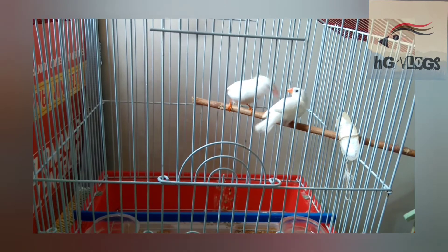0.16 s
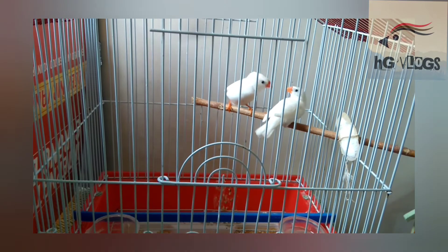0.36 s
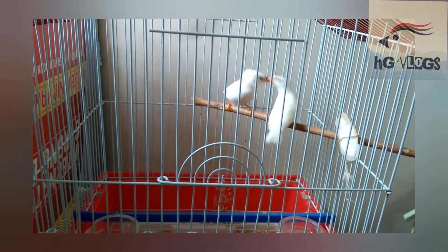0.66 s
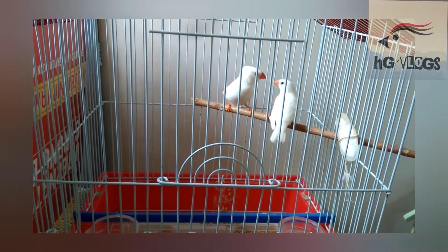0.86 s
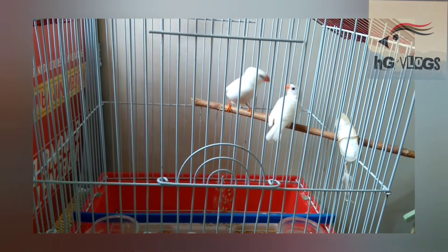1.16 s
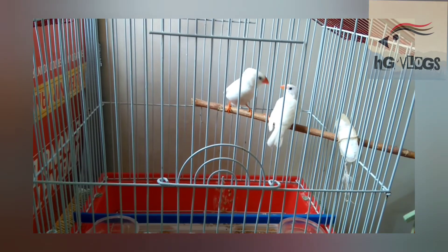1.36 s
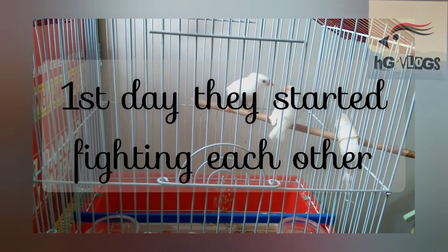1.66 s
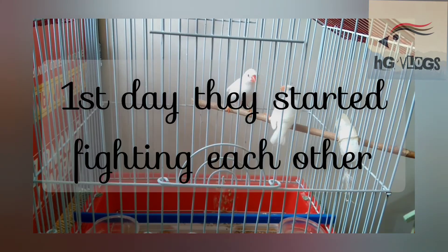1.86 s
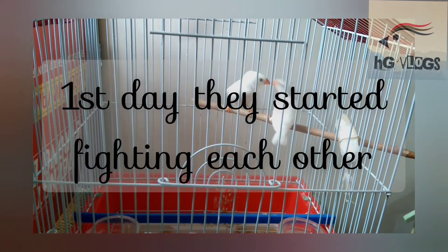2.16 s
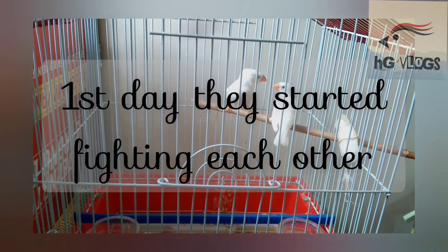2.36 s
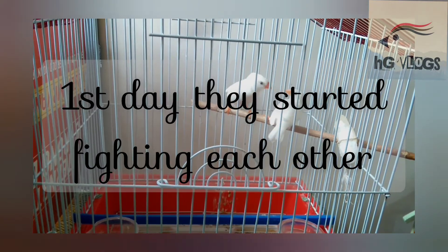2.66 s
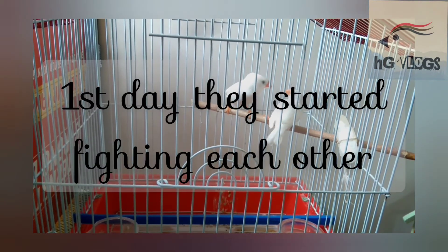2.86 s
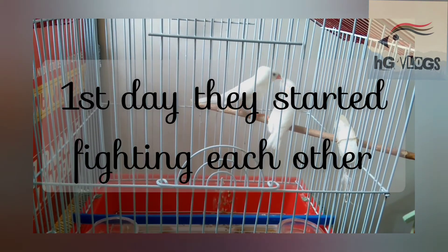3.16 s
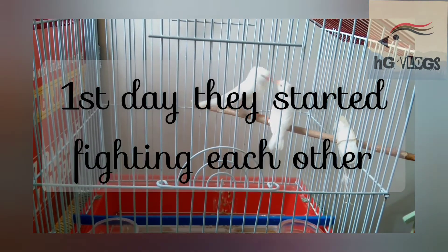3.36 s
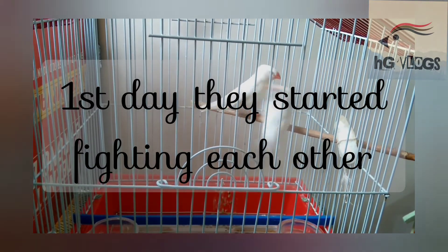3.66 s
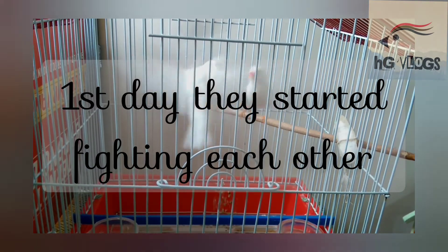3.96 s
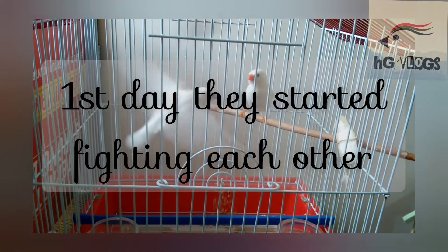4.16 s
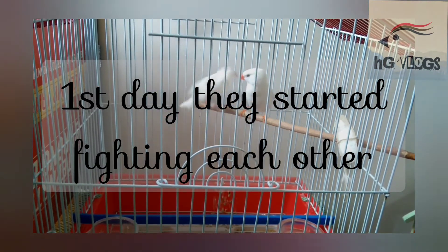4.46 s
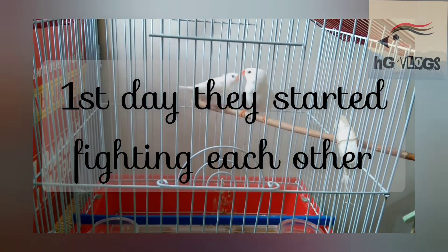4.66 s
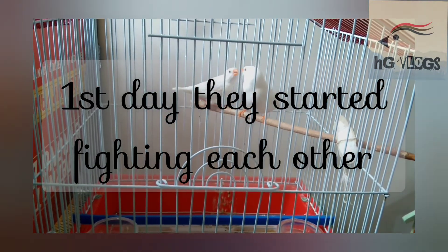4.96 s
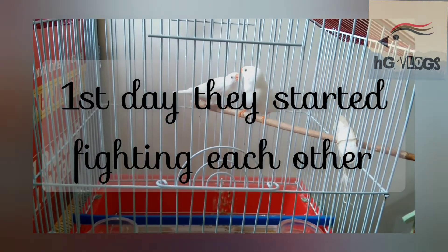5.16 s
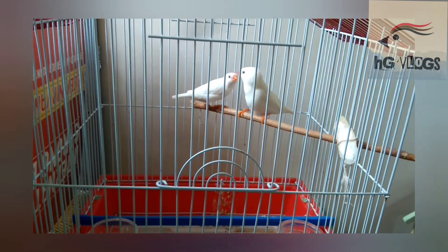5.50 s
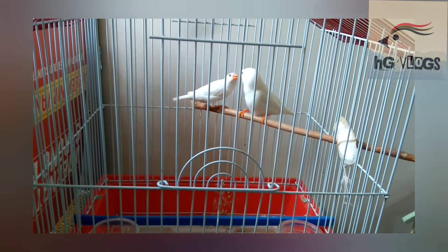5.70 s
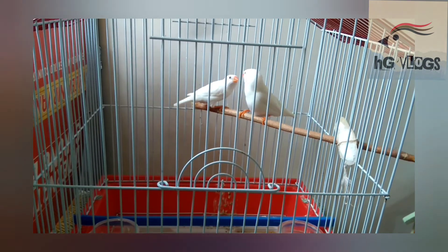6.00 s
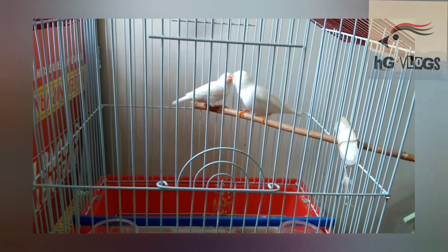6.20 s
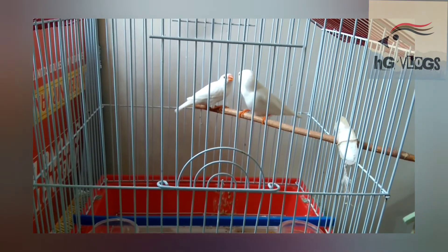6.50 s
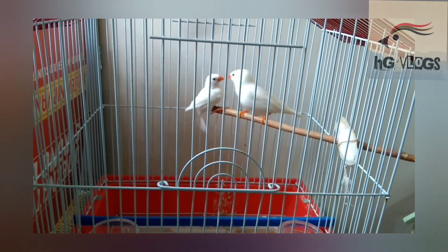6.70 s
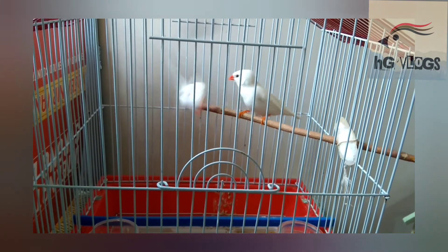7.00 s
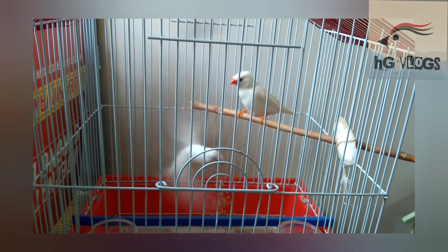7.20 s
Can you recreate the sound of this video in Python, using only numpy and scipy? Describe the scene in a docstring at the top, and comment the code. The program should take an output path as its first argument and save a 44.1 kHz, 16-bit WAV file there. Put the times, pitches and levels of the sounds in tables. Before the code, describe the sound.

Small caged birds give sharp nasal chirps and quick whistle-to-rasp phrases, wings whirring in short bursts, feet ticking on perch and wire.

```python
"""Finches squabbling in a cage

Zebra finches squabble in a wire cage in a small, hard-walled room. Between calls a male repeats one motif:
nasal stack, rasp, whistle breaking into a harsh slide, then a snarl or a soft ending. Voices are stacked
harmonics, near-pure whistles and noise bands. Wings whirr as pulsing noise, and feet knock on perch and wires
as ringing tones. The recorder's expander pulls the room noise down in the pauses."""
import sys
import numpy as np
from scipy import signal
from scipy.fft import rfft, irfft, next_fast_len
from scipy.io import wavfile
from scipy.ndimage import uniform_filter1d

SR = 44100
rng = np.random.default_rng(int(sys.argv[2]) if len(sys.argv) > 2 else 0)


def unload_audio(sound):
    """Save the sound as a 16-bit wav file, at the path given as the first command line argument."""
    columns = np.transpose(np.atleast_2d(sound))
    # keep every value between -1 and 1, then stretch to whole-number steps
    steps = np.round(np.clip(columns, -1, 1) * 32767)
    wavfile.write(sys.argv[1], SR, steps.astype(np.int16))


N = 323694
TIME = np.arange(N) / SR


def from_db(db):
    """Turn decibels into gain."""
    return 10 ** (np.asarray(db) / 20)


def rms_one(x):
    """Scale to unit power."""
    return x / np.sqrt(np.mean(x ** 2) + 1e-20)


def along(rows, t):
    """Read each column of a curve at the times t."""
    s, *columns = np.transpose(rows)
    return [np.interp(t, s, c) for c in columns]


def at_hz(points, hz):
    """Read a curve over frequency, with frequency on a log scale."""
    f, value = np.transpose(points)
    return np.interp(np.log(hz + 1), np.log(f), value)


def coloured(x, spectrum, tilt_db=0):
    """Filter by a spectrum, tilted in dB per octave about 4 kHz and falling away below its first point."""
    size = next_fast_len(x.shape[-1])
    hz = np.fft.rfftfreq(size, 1 / SR) + 1
    octaves = np.log2(hz / 4000)
    gain = from_db(at_hz(spectrum, hz) + tilt_db * octaves)
    gain = gain * np.minimum(hz / spectrum[0][0], 1) ** 2
    return irfft(rfft(x, size) * gain, size)[..., :x.shape[-1]]


def wobble(size, hz):
    """Random motion up to about a given rate, with spread 1."""
    low_pass = signal.butter(2, hz, fs=SR, output="sos")
    noise = rng.standard_normal(2 * size)
    return rms_one(signal.sosfilt(low_pass, noise)[size:])  # skip the filter's start


# How alike diffuse sound is at the two ports. Each row: frequency in Hz, likeness (1 is identical).
PORT_LIKENESS = [(30, 0.62), (150, 0.94), (350, 0.9), (700, 0.29), (2000, 0.13), (10000, 0.11)]


def stereo_noise(spectrum):
    """Diffuse noise reaches both ports much alike in the bass and mostly unalike in the treble."""
    mid, side = rfft(rng.standard_normal((2, next_fast_len(N, True))))
    alike = np.clip(at_hz(PORT_LIKENESS, np.linspace(0, SR / 2, len(mid))), -1, 1)
    pair = irfft(np.sqrt(1 + alike) * mid + np.sqrt(1 - alike) * side * [[1], [-1]])
    return rms_one(coloured(pair[:, :N], spectrum))


# Colour of the room's own noise. Each row: frequency in Hz, relative level in dB per Hz.
ROOM_NOISE_COLOUR = [(20, -28.5), (60, -5), (110, -7.5), (200, -5.5), (380, 2.5), (600, -2), (1000, -6),
                     (2000, -12), (4000, -20), (8000, -22.5), (14000, -28.5)]


def room_noise(level_db=-53):
    """The room's own noise is steady, diffuse and strongest in the lower range."""
    return from_db(level_db) * stereo_noise(ROOM_NOISE_COLOUR)


def add(out, sound, s, pan_db):
    """Mix a sound in at a time in seconds; a positive balance leans left."""
    start = round(s * SR)
    part = sound[max(-start, 0):max(N - start, 0)]
    start = max(start, 0)
    out[:, start:start + len(part)] += part * from_db([[pan_db / 2], [-pan_db / 2]])


def sing(events, gesture, source, timbre, gain_db, tilt_db=0, pitch_spread=.005):
    """Play one syllable's gesture at each of its times, never quite at the same pitch."""
    out = np.zeros((2, N))
    for s, level_db, length, transpose, pan_db in events:
        # Finer steps through the gesture make it last longer.
        t = np.arange(gesture[0][0], gesture[-1][0], 1 / (SR * length))
        pitch, effort_db, rough = along(gesture, t)
        pitch = pitch * transpose * (1 + pitch_spread * rng.standard_normal())
        voice = source(pitch, effort_db, np.clip(rough, 0, 1), tilt_db, timbre)
        add(out, voice * from_db(level_db + effort_db + gain_db), s + t[0] * length, pan_db)
    return out


def reedy(pitch, effort_db, rough, tilt_db, throat,
          jitter=.06, jitter_hz=330, shimmer=0.38, mellowing=0.55, blur_hz=8000):
    """The syrinx gives 20 harmonics, duller at low effort; when rough, its cycles jitter and air hisses."""
    size = len(pitch)
    shaky_pitch = pitch * (1 + jitter * rough * wobble(size, jitter_hz))
    phase = 2 * np.pi * np.cumsum(shaky_pitch) / SR
    k = np.arange(1, 21)[:, None]  # harmonic numbers
    strength = from_db(mellowing * effort_db * np.log2(k)) / (1 + (k * pitch / blur_hz) ** 6)
    strength /= np.sqrt(np.sum(strength ** 2, axis=0) / 2)
    start_phases = rng.uniform(0, 2 * np.pi, k.shape)
    partials = np.sum(strength * np.cos(k * phase + start_phases), axis=0)
    hiss = rms_one(rng.standard_normal(size) * (1 + 1.4 * np.cos(phase)))  # pulses with each cycle
    voice = coloured((1 - rough) * partials + from_db(4) * rough * hiss, throat, tilt_db)
    # Even out the loudness, so that the gesture alone sets the level.
    voice = voice / np.sqrt(uniform_filter1d(voice ** 2, size=400) + 1e-12)
    return voice * (1 + shimmer * rough * wobble(size, jitter_hz))


# In all the tables below, levels are in dB before the gain that each sound gets when played.
# A loud call, rising then falling. Each row: seconds after onset, pitch in Hz, level in dB, roughness 0-1.
LOUD_CALL = [(-.006, 1110, -27.5, 0.4), (0, 1270, -8.5, 0.53), (.011, 1447, -4, 0.2), (.032, 1523, 0, .12),
             (.044, 1490, -4.5, .22), (.056, 1309, -3, 0), (.067, 1060, -12, .45), (.080, 905, -8.5, 0.5),
             (0.09, 881, -29, 0.4)]
# A short, gently falling call. Each row: seconds after onset, pitch in Hz, level in dB, roughness 0-1.
TET_CALL = [(-.004, 892, -18, .15), (.010, 878.4, -4, .12), (.028, 871, -4, .12), (0.049, 836, -2, 0.1),
            (.070, 795, -4, .3), (0.082, 773, -42, .4)]
# A call sliding down. Each row: seconds after onset, pitch in Hz, level in dB, roughness 0-1.
SLURRED_CALL = [(-.006, 1196, -21, 0.14), (0.017, 1140, -10.5, 0.24), (0.037, 1026, -9.5, .3),
                (.053, 889, -6.5, .36), (0.078, 746, -9.5, 0.87)]
# A short note turning rough. Each row: seconds after onset, pitch in Hz, level in dB, roughness 0-1.
SHORT_NOTE = [(-.014, 1020, -14, .08), (-.003, 986.5, -7.5, 0.092), (.008, 992, -3.5, .1),
              (.019, 920, -7, 0.27), (0.031, 809, -4, 0.98)]
# A short hoarse note. Each row: seconds after onset, pitch in Hz, level in dB, roughness 0-1.
HOARSE_NOTE = [(-.016, 1104, -6, 0.67), (.002, 1031, 0.5, 0.57), (0.019, 953, -0.5, 0.53),
               (0.033, 796, -4.5, 0.4), (0.043, 700, -29.5, .8)]
# A low note, up then down. Each row: seconds after onset, pitch in Hz, level in dB, roughness 0-1.
MEWING_NOTE = [(-.008, 601, -15.5, 0.62), (.004, 631, -4.5, .3), (.018, 674, -0.5, 0.18),
               (0.033, 620, -9.5, .3), (.044, 571, -20, 0.78)]
# A soft arc that leaps up and falls. Each row: seconds after onset, pitch in Hz, level in dB, roughness 0-1.
SOFT_ARC = [(-.002, 897, -12, .15), (.005, 1726, -10, .09), (.012, 1638, -10.5, .08),
            (.021, 1330, -12, .08), (.029, 952, -13.5, .12), (0.036, 751, -24.5, .4)]
# Throat and beak colour of the loud call and mew. Each row: frequency in Hz, level in dB.
LOUD_CALL_THROAT = [(700, -12.5), (1500, -17.5), (2200, -16.5), (3000, -11.5), (4500, -2), (6000, -8),
                    (7000, -8.5), (8500, -16), (11000, -20), (14000, -49.5)]
# Throat and beak colour of the tet call. Each row: frequency in Hz, level in dB.
TET_CALL_THROAT = [(850, -19), (1750, -15.5), (2600, -1.5), (3500, 0), (4400, 0), (5300, -12.5),
                   (7000, -13), (9000, -12.5), (14000, -40.5)]
# Throat and beak colour of slurred, short and hoarse notes. Each row: frequency in Hz, level in dB.
SOFT_NOTE_THROAT = [(600, -20), (1100, -7), (1900, -9.5), (3000, 3.5), (4300, -1), (5600, -2.5), (6600, -5),
                    (9000, -13), (14000, -41)]
# Throat and beak colour of the arc. Each row: frequency in Hz, level in dB.
SOFT_ARC_THROAT = [(700, -5), (1100, -5), (1650, -11.5), (2400, -6), (3300, -14.5), (5000, -14), (7000, -8),
                   (14000, -35)]
# Loud calls. Each row: start in seconds, level in dB, length factor, pitch factor, left-right in dB.
LOUD_CALL_TIMES = [(.2024, -15, .88, 0.99, 7.5), (.9509, -15.5, 0.96, 0.98, 0)]
# Tet calls. Each row: start in seconds, level in dB, length factor, pitch factor, left-right in dB.
TET_TIMES = [(.8744, -30.5, 0.97, 0.99, .5), (3.6552, -38, 1.0, 0.87, 5.9)]
# Slurred calls. Each row: start in seconds, level in dB, length factor, pitch factor, left-right in dB.
SLUR_TIMES = [(.1243, -32, 0.96, 1.08, 2), (2.103, -39.5, 0.79, 1.05, 2), (3.6067, -39, 0.74, 1.0, 4.5),
              (5.0958, -41, 0.72, 1.03, 5.7)]
# Short notes. Each row: start in seconds, level in dB, length factor, pitch factor, left-right in dB.
SHORT_NOTE_TIMES = [(1.934, -35, 0.91, .98, 0.5), (4.92, -35.5, 0.86, 1.03, 5.5)]
# Hoarse notes. Each row: start in seconds, level in dB, length factor, pitch factor, left-right in dB.
HOARSE_NOTE_TIMES = [(.0034, -32, 1.0, 1.0, -2.5), (6.7402, -31.5, 1, 0.95, 6.5)]
# Mews. Each row: start in seconds, level in dB, length factor, pitch factor, left-right in dB.
MEW_TIMES = [(.7676, -28, 0.94, 0.95, 0)]
# Soft arcs between the motifs. Each row: start in seconds, level in dB.
ARC_TIMES = [(0.359, -36.5), (1.106, -34), (2.2068, -35.5), (2.6901, -34), (3.709, -35), (5.2147, -36.5),
             (5.6801, -38), (6.1935, -36), (6.7133, -35.5)]
ARC_PAN_DB = 5


def calls(trail_after_s=.034, trail_db=-16.5):
    """The syrinx gives single calls, loud and soft; each soft arc trails off into a faint hoarse note."""
    arcs = [(s, level_db, 1, 1, ARC_PAN_DB) for s, level_db in ARC_TIMES]
    trails = [(s + trail_after_s, level_db, 1, 1, ARC_PAN_DB) for s, level_db in ARC_TIMES]
    return (sing(LOUD_CALL_TIMES, LOUD_CALL, reedy, LOUD_CALL_THROAT, gain_db=-6.5, tilt_db=2.0)
            + sing(TET_TIMES, TET_CALL, reedy, TET_CALL_THROAT, gain_db=-1.0)
            + sing(SLUR_TIMES, SLURRED_CALL, reedy, SOFT_NOTE_THROAT, gain_db=0, tilt_db=0.7)
            + sing(SHORT_NOTE_TIMES, SHORT_NOTE, reedy, SOFT_NOTE_THROAT, gain_db=-6.0)
            + sing(HOARSE_NOTE_TIMES, HOARSE_NOTE, reedy, SOFT_NOTE_THROAT, gain_db=-9, tilt_db=3.0)
            + sing(MEW_TIMES, MEWING_NOTE, reedy, LOUD_CALL_THROAT, gain_db=-6, tilt_db=3.0)
            + sing(arcs, SOFT_ARC, reedy, SOFT_ARC_THROAT, gain_db=-1.0)
            + sing(trails, HOARSE_NOTE, reedy, SOFT_NOTE_THROAT, gain_db=trail_db, tilt_db=-0.5))


def whistled(pitch, effort_db, rough, tilt_db, spread_hz):
    """A near-pure tone breaks up, when rough, into a chaotic band round its pitch."""
    size = len(pitch)
    phase = 2 * np.pi * np.cumsum(pitch) / SR
    tone = np.sqrt(2) * np.sin(phase)
    chaos = wobble(size, spread_hz) * np.cos(phase) + wobble(size, spread_hz) * np.sin(phase)
    voice = ((1 - rough) * tone + rough * chaos) / np.hypot(1 - rough, rough)
    return voice * from_db(tilt_db * np.log2(pitch / pitch.mean()))


def harsh(pitch, effort_db, rough, tilt_db, band, flutter=.35, flutter_hz=300):
    """Chaotic vibration gives a fluttering band of noise with a sharp lower edge at the pitch."""
    size = len(pitch)
    chaos = signal.hilbert(coloured(rng.standard_normal(size), band, tilt_db))
    shift = np.exp(2j * np.pi * np.cumsum(pitch) / SR)  # moves the whole band up by the pitch
    voice = rms_one(np.real(chaos * shift))
    return voice * (1 + flutter * rough * wobble(size, flutter_hz))


def buzzing(pitch, effort_db, rough, tilt_db, spread_hz, beat_hz=1730, depth=0.27):
    """The other side of the syrinx shakes a whistle, adding a sideband above and below it."""
    beat = np.cos(2 * np.pi * beat_hz * np.arange(len(pitch)) / SR)
    return whistled(pitch, effort_db, rough, tilt_db, spread_hz) * (1 + depth * beat)


# A faint lead-in to the stack. Each row: seconds after onset, pitch in Hz, level in dB, roughness 0-1.
STACK_LEAD_IN = [(-.032, 1064, -31.5, .05), (-.020, 1054, -17.5, .05), (-.007, 1032, -22, .04),
                 (.004, 1042, -26, .15), (.014, 930, -15.5, .2), (.026, 835, -15, 0.19)]
# The nasal stack, sinking in pitch. Each row: seconds after onset, pitch in Hz, level in dB, roughness 0-1.
NASAL_STACK = [(-.006, 658.5, -24.5, 0.24), (.003, 643.2, -7.5, 0.16), (.016, 631, -5, 0.24),
               (.029, 490.8, -4, .17), (.042, 440, -9.5, 0.39), (.053, 426.4, -23.5, .6)]
# The rasp. Each row: seconds from the whistle's onset, pitch in Hz, level in dB, roughness 0-1.
SHORT_RASP = [(-.041, 879, -17, 0.61), (-.037, 1057, -3, 0.39), (-.029, 1080, 1.5, .6),
              (-.021, 845, 0, 0.66)]
# A tiny high pip. Each row: seconds from the whistle's onset, pitch in Hz, level in dB, roughness 0-1.
HIGH_PIP = [(-.016, 5550, -33, .15), (-.012, 5230, -6, .2), (-.007, 5150, -25.5, .3)]
# The whistle, breaking up. Each row: seconds after onset, pitch in Hz, level in dB, roughness 0-1.
BREAKING_WHISTLE = [(-.001, 5800, -30, .2), (.004, 5530, -4.5, .055), (.013, 5340, 1.5, .04),
                    (.017, 6450, -4, .2), (0.025, 6150, -8, .55), (.036, 5418, -10, 1),
                    (.054, 4900, -11, .8)]
# A second tone under the whistle. Each row: seconds after onset, pitch in Hz, level in dB, roughness 0-1.
WHISTLE_UNDERTONE = [(0, 4250, -36, 0), (.007, 4270, -23, .1), (.018, 4280, -23, .2), (.027, 4070, -26, .4)]
# The harsh slide down. Each row: seconds after onset, lower edge in Hz, level in dB, roughness 0-1.
HARSH_SLIDE = [(-.022, 5203, -20, .92), (-.013, 4692, -10, 0.93), (-.006, 3519, -15, 0.99),
               (.004, 3250, -5.5, 1), (.026, 3085, -0.5, 1), (.042, 2850, -5, 1), (.055, 2373, -5, 0.97),
               (.066, 2362, -18, .89)]
# The snarl. Each row: seconds after onset, pitch in Hz, level in dB, roughness 0-1.
LONG_SNARL = [(-.004, 1600, -13.5, 0.4), (.006, 1749, -5, 0.5), (.036, 1713, -0.5, 0.45),
              (.050, 1604, -6.5, 0.56), (.068, 1252, -2.5, 0.41), (.094, 1050, -3, 0.49),
              (.124, 929.5, -4.5, .48), (.142, 820, -11.5, 1)]
# The far side of the syrinx buzzing through the snarl.
# Each row: seconds after the snarl's onset, pitch in Hz, level in dB, roughness 0-1.
SNARL_BUZZ = [(-.048, 5100, -14, 0.4), (-.024, 5020, 5.5, 1), (0, 4986, -10, 0), (.030, 4810, 2.5, 0),
              (0.056, 4800, 1.5, .8), (.115, 4960, -14, 0), (.138, 4960, -35, .9)]
# Throat and beak colour of the stack. Each row: frequency in Hz, level in dB.
NASAL_STACK_THROAT = [(500, -39), (1150, -4.5), (1700, -12), (2500, -2.5), (3300, 5.5), (4200, 4.5),
                      (5200, 3), (6000, -4.5), (9000, -12), (14000, -40.5)]
# Throat and beak colour of the rasp. Each row: frequency in Hz, level in dB.
SHORT_RASP_THROAT = [(500, -11), (1000, -10), (2500, -1), (3500, 3), (5500, 2.5), (6800, 0.5), (9000, -8),
                     (14000, -49)]
# Throat and beak colour of the snarl. Each row: frequency in Hz, level in dB.
LONG_SNARL_THROAT = [(600, -12), (1100, -7), (1700, -6), (2300, -6.5), (3300, 0), (4100, 2), (5000, 2.5),
                     (6300, -4), (8500, -10.5), (14000, -31.5)]
# The harsh slide's noise band. Each row: Hz above its lower edge, level in dB.
HARSH_SLIDE_BAND = [(250, 8.5), (550, 6.5), (1150, 3.5), (1900, -13.5), (3000, -9.5), (4500, -20.5),
                    (7000, -42.5), (11000, -64.5)]
# The motifs. Each row: whistle's time in seconds, seconds by which the stack comes before it, level in dB,
# whistle's extra level in dB, whistle's pitch factor, left-right in dB, ends in a snarl (0 or 1).
MOTIF_TIMES = [(0.6111, 0.13, -24.5, 2.5, 1.015, 7, 0), (1.356, 0.13, -25, 2, 1.05, 7, 0),
               (2.4562, 0.12, -24.5, 2.5, 0.98, 3, 0), (2.9452, 0.13, -24, 3.5, 1.018, 4.5, 1),
               (3.9597, 0.13, -23.5, 2.5, 0.99, 5.5, 0), (5.464, 0.12, -23.5, -1.5, 0.96, 4, 0),
               (5.8911, 0.13, -23.5, -3, .975, 6.5, 1), (6.4419, 0.12, -25, 1, 0.95, 6, 0),
               (6.963, 0.13, -23, 0, 0.98, 7.5, 0)]
# The motif's rhythm, in seconds after the whistle.
SLIDE_AFTER_S, SNARL_AFTER_S, ARC_AFTER_S, HOARSE_AFTER_S = .041, .096, 0.13, .132
CLOSING_ARC_LENGTH = .78  # length factor: the arc that closes a motif is hurried


def song():
    """Motifs keep nearly one rhythm; the syrinx's two sides overlap in stack, whistle and snarl."""
    stacks, rasps, whistles, slides, snarls, arcs, hoarse_notes = [], [], [], [], [], [], []
    for s, lead_s, level_db, whistle_db, pitch, pan_db, snarled in MOTIF_TIMES:
        stacks.append((s - lead_s, level_db, 1, 1, pan_db))
        rasps.append((s, level_db, 1, 1, pan_db))
        whistles.append((s, level_db + whistle_db, 1, pitch, pan_db))
        slides.append((s + SLIDE_AFTER_S, level_db, 1, 1, pan_db))
        if round(snarled):
            snarls.append((s + SNARL_AFTER_S, level_db, 1, 1, pan_db))
        else:
            arcs.append((s + ARC_AFTER_S, level_db, CLOSING_ARC_LENGTH, 1, ARC_PAN_DB))
            hoarse_notes.append((s + HOARSE_AFTER_S, level_db, 1, 1, pan_db))
    # A whistled sound's plain number is the spread of its chaos in Hz.
    return (sing(stacks, STACK_LEAD_IN, reedy, NASAL_STACK_THROAT, gain_db=-7.0)
            + sing(stacks, NASAL_STACK, reedy, NASAL_STACK_THROAT, gain_db=-8.5)
            + sing(rasps, SHORT_RASP, reedy, SHORT_RASP_THROAT, gain_db=-16.0, tilt_db=-1)
            + sing(rasps, HIGH_PIP, whistled, 400, gain_db=-4.5)
            + sing(whistles, BREAKING_WHISTLE, whistled, 340, gain_db=-7)
            + sing(whistles, WHISTLE_UNDERTONE, whistled, 150, gain_db=-2)
            + sing(slides, HARSH_SLIDE, harsh, HARSH_SLIDE_BAND, gain_db=-8, tilt_db=0.9)
            + sing(snarls, LONG_SNARL, reedy, LONG_SNARL_THROAT, gain_db=-8.5)
            + sing(snarls, SNARL_BUZZ, buzzing, 210, gain_db=-14.5)
            + sing(arcs, SOFT_ARC, reedy, SOFT_ARC_THROAT, gain_db=-16.5)
            + sing(hoarse_notes, HOARSE_NOTE, reedy, SOFT_NOTE_THROAT, gain_db=-23.5, tilt_db=-1.0))


# Flurries of wing beats.
# Each row: start in seconds, length in seconds, air puff level in dB, feather rustle level in dB.
WING_FLURRIES = [(0.761, 0.03, -64, -55), (3.625, 0.088, -69, -63), (3.866, .23, -49.5, -55),
                 (4.136, .36, -51.5, -58), (4.558, 0.038, -55, -51.5), (4.66, 0.098, -59, -57.5),
                 (6.046, 0.37, -58, -65), (6.431, 0.21, -52.5, -64), (6.717, 0.086, -57, -48.5),
                 (6.837, 0.46, -53, -55)]
# Colour of the air puffs. Each row: frequency in Hz, relative level in dB per Hz.
PUFF_COLOUR = [(25, -24), (65, -8.5), (170, -1), (290, -2), (520, -5), (1000, -11), (2500, -36.5)]
# Colour of the feather rustle. Each row: frequency in Hz, relative level in dB per Hz.
FEATHER_COLOUR = [(500, -2.5), (1200, -0.5), (3500, -2), (6000, -5), (10000, -5), (14000, -20.5)]
WINGBEATS_PER_S = 29  # on average
FLURRY_ATTACK_S, FLURRY_RELEASE_S = 0.03, .07


def wings(puff_depth=0.41, rustle_depth=0.088, uneven_db=1.0):
    """Flurries swell, hold and fade; each uneven stroke pushes a puff of air and brushes the feathers."""
    air, brush = 0, 0
    for s, length_s, puff_db, rustle_db in WING_FLURRIES:
        before = (s - TIME) / FLURRY_ATTACK_S
        after = (TIME - s - length_s) / FLURRY_RELEASE_S
        effort = np.exp(-np.clip(np.maximum(before, after), 0, 20))
        air = np.maximum(air, from_db(puff_db) * effort)
        brush = np.maximum(brush, from_db(rustle_db) * effort)
    beat_hz = WINGBEATS_PER_S * (1 + 0.1204 * wobble(N, 7.96))
    stroke = np.cos(2 * np.pi * np.cumsum(beat_hz) / SR)
    puffs = air * rms_one(np.exp(puff_depth * stroke)) * stereo_noise(PUFF_COLOUR)
    rustle = brush * rms_one(np.exp(rustle_depth * stroke)) * stereo_noise(FEATHER_COLOUR)
    return (puffs + rustle) * from_db(uneven_db * wobble(N, 42))


# Feet and beaks on perch and wires. Each row: start in seconds, level in dB before the gain.
KNOCK_TIMES = [(3.911, -26.5), (3.93, -40), (4.155, -37), (4.394, -45), (4.42, -52), (4.487, -56),
               (4.557, -44), (7.099, -36.5), (7.157, -51), (7.22, -39)]
# What the cage rings with. Each row: frequency in Hz, average level in dB, seconds to fade by 60 dB.
CAGE_RINGS = [(397, -12.5, 0.056), (714, -7.5, 0.041), (920, -19.5, 0.09), (1720, -20, .04),
              (2810, -13.5, 0.067), (3870, -19, 0.15), (6550, -7, 0.042), (8440, -10, 0.038)]


def cage(gain_db=-3, crack_db=-6, crack_s=0.0031):
    """Each knock is a short crack of noise that sets the perch and wires ringing."""
    out, t = np.zeros((2, N)), TIME[:SR // 4]
    for s, level_db in KNOCK_TIMES:
        ring = 0
        for hz, db, t60 in CAGE_RINGS:
            fading_db = db + rng.normal(0, 2.9) - 60 * t / t60  # every knock excites the rings differently
            ring = ring + from_db(fading_db) * np.sin(2 * np.pi * hz * t)
        crack = from_db(crack_db) * rng.standard_normal(len(t)) * np.exp(-t / crack_s)
        add(out, from_db(level_db + gain_db) * (ring + crack), s, pan_db=7.5)
    return out


# How the recorder's body shades the two ports. Each row: frequency in Hz, left-right in dB.
PORT_BALANCE = [(500, -2.5), (1200, -5), (2400, -4), (4500, 0.5), (8000, 7), (12000, -6.5)]
# Sound bending round the recorder's body. Each row: frequency in Hz, radians by which the left port leads.
PORT_LEAD = [(400, .1), (1200, 0.5), (2400, 1.32), (4500, 1.8), (6200, 2.02), (8500, 4.34), (12000, 5)]


def ports(x):
    """The cage's sound reaches the left port just before the right, with a balance that varies with pitch."""
    size = next_fast_len(N, True)
    hz = np.fft.rfftfreq(size, 1 / SR)
    left = from_db(at_hz(PORT_BALANCE, hz) / 2)
    right = np.exp(-1j * at_hz(PORT_LEAD, hz)) / left
    return irfft(rfft(x, size) * [left, right], size)[:, :N]


# How long the room echoes. Each row: frequency in Hz, seconds for the tail to fade by 60 dB.
ROOM_FADE = [(300, 0.45), (1500, 0.61), (4000, 0.43), (7000, 0.46), (14000, 0.36)]


def room(x, wet_db=-6, near_db=-7, near_s=0.016):
    """The wall behind the cage reflects quickly; a diffuse tail follows, its length varying with pitch."""
    t, tail = TIME[:SR * 3 // 4], 0
    edges = np.geomspace(150, 16000, 9)  # band edges in Hz
    for low, high in zip(edges, edges[1:]):
        band_pass = signal.butter(2, [low, high], "band", fs=SR, output="sos")
        band = signal.sosfilt(band_pass, rng.standard_normal((2, len(t))))
        tail = tail + band * from_db(-60 * t / at_hz(ROOM_FADE, np.sqrt(low * high)))
    near = rng.standard_normal((2, len(t))) * np.exp(-t / near_s) * (t > .001)
    response = from_db(wet_db) * rms_one(tail * (t > .006)) + from_db(near_db) * rms_one(near)
    response = response / np.sqrt(len(t))
    return signal.fftconvolve(x.mean(axis=0)[None], response, axes=1)[:, :N]


def scene():
    """Mix birds and cage, their echo in the room, wings and the room's own noise."""
    direct = calls() + song() + cage()
    return ports(direct) + room(direct) + wings() + room_noise()


def record(dry, open_db=-43, slope=1.504, depth_db=22, release_db_per_s=200, cutoff_hz=14200):
    """The recorder's expander turns quiet stretches down, and a steep filter cuts the top."""
    power = uniform_filter1d(np.mean(dry ** 2, axis=0), size=900)
    level_db = 10 * np.log10(power + 1e-12)
    # Follow rises at once, but let the held level fall only at the release rate.
    release = release_db_per_s * TIME
    held_db = np.maximum.accumulate(level_db + release) - release
    gain_db = uniform_filter1d(np.clip(slope * (held_db - open_db), -depth_db, 0), size=600)
    low_pass = signal.ellip(10, .1, 80, cutoff_hz, fs=SR, output="sos")
    return signal.sosfilt(low_pass, dry * from_db(gain_db))


dry = scene()
out = record(dry)
unload_audio(out)
```